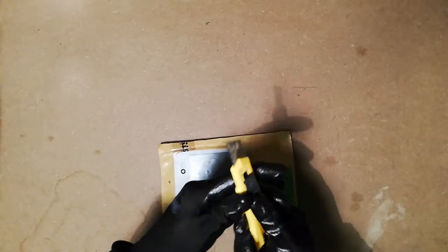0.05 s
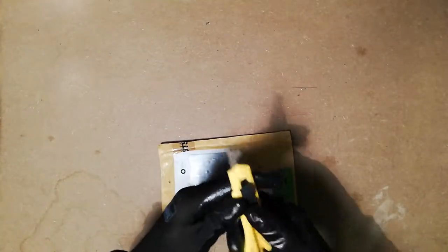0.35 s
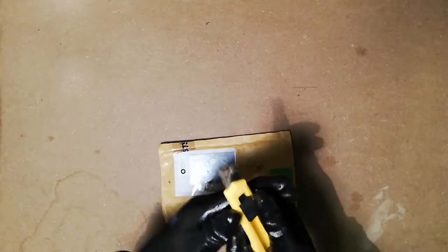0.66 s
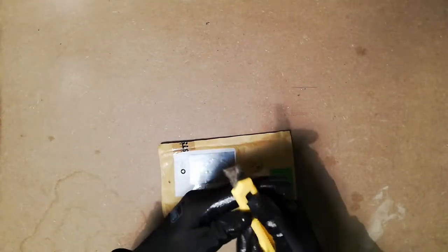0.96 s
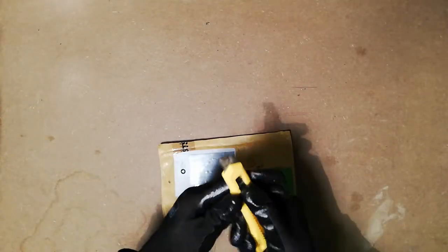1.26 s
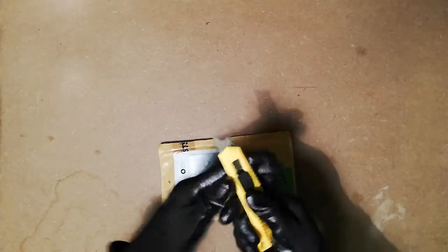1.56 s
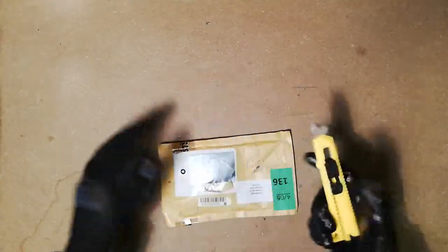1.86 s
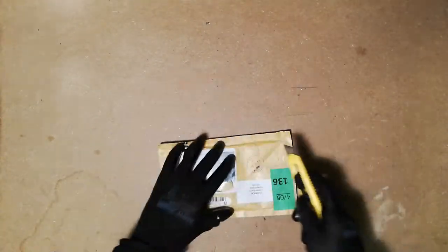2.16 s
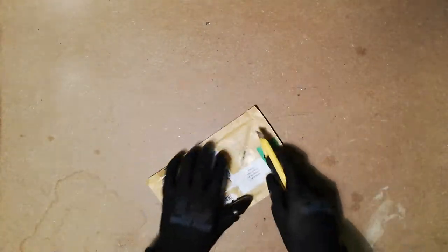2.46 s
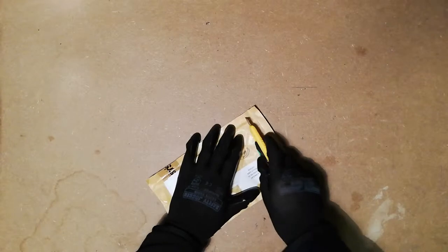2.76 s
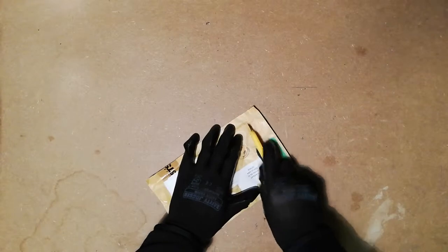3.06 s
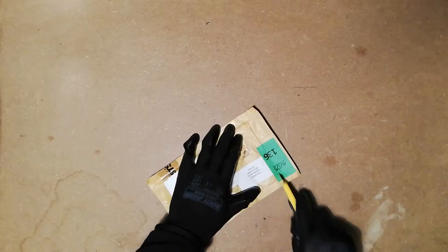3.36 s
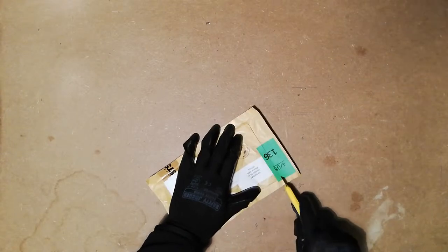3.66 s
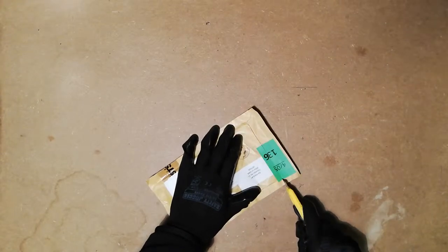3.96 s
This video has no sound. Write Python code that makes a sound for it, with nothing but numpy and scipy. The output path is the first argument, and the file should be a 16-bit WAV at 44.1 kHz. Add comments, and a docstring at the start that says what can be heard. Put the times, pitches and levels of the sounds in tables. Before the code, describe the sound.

A blade slices a padded envelope in one bright rip, after ticking and snapping into place in its plastic handle and some paper scuffing and crackling. A stereo microphone hangs above the table in a small quiet room.

```python
"""A plastic utility knife ticks and rattles in gloved hands; its steel blade snaps home twice and rings.
A padded paper envelope sticks, slips and buckles on a table while a low hum swells and stops.
The blade then rips along it in one stroke, snapping fibres; the slit rings lower as it grows.
Small quiet room, stereo microphone above the table."""
import sys
import numpy as np
from scipy import signal
from scipy.fft import rfft, irfft
from scipy.io import wavfile

SR = 44100
rng = np.random.default_rng(int(sys.argv[2]) if len(sys.argv) > 2 else 0)


def wav_record(signal):
    """Record a signal, one row per channel, as 16-bit PCM in the file named by sys.argv[1]."""
    frames = np.transpose(np.atleast_2d(signal))
    bounded = np.clip(frames, -1, 1)
    # unit amplitude maps onto the largest positive 16-bit level
    quanta = np.round(bounded * 32767).astype(np.int16)
    wavfile.write(sys.argv[1], SR, quanta)


N = 176400

# blade locks: t/s, level/dB, body/dB, crack/dB, treble/dB, handle resonance/Hz, ring/dB, ring decay/s
SNAPS = [(1.0854, -9, -30.5, -21, -12, 4780, 9, 0.001), (1.1475, -8, -33.5, -16.5, -14, 3090, 5, 0.0022)]
# paper response: f/Hz, level/dB
PAPER = [(250, -22), (800, -13.5), (1180, -1), (1480, -4), (2100, -3), (3000, -4.5), (7500, -9),
         (10500, -3), (16000, -28.5)]
FAST_EDGE_S, SLOW_EDGE_S = 0.0047, 0.042


def knife():
    """The slider ticks, the loose blade rattles and twice snaps home in the plastic handle."""
    # slider: t/s, level/dB, body/dB, crack/dB, treble/dB, handle resonance/Hz
    clicks = [(0.366, -35.5, -10.5, -26, -10.5, 5600), (0.54, -22.5, -14, -11.5, -21.5, 3680),
              (0.659, -28.5, -49, -8, -6, 3140), (0.885, -39.5, -13.5, -6.5, -7.5, 1570),
              (0.902, -28, -36, -8, -12, 3140), (1.303, -23.5, -24.5, -15.5, -14, 2660),
              (1.375, -16.5, -27.5, -12, -13, 3050), (1.472, -22, -16.5, -9.5, -14.5, 4840),
              (1.552, -29.5, -29, -5.5, -14.5, 2970), (1.584, -19, -28.5, -19, -24, 5670),
              (3.949, -48.5, -30, -5, -1.5, 6000)]
    faint_ticks = [(0.088, -30), (.262, -33.5), (.317, -37.5), (.464, -36.5), (.536, -27.5), (.765, -34.5),
                   (0.791, -39), (.978, -36.5), (1.076, -26), (1.136, -31), (1.315, -29), (1.4, -30.5),
                   (2.964, -32.5)]  # faint slider ticks and loose-blade rattles, with common band levels: t/s, level/dB
    handle = [(700, -22), (1250, -8), (1800, 0), (2250, -5), (3100, 3), (6000, -6), (9500, 2), (15000, -16)]  # handle response: f/Hz, level/dB
    faint_bands_db = (-27, -14, -16)
    ticks = knocks(clicks + [(*row, *faint_bands_db) for row in faint_ticks], handle, decay_s=0.0018)
    snaps = knocks([row[:-2] for row in SNAPS], handle, decay_s=0.002)
    return undb(-1) * ticks + undb(1.5) * snaps


def blade_ring():
    """The steel rings briefly at each snap, beamed at the left microphone."""
    modes = [(10050, -9), (10145, -8.5), (9030, -14.5), (11300, -17), (8500, -17)]  # steel modes: f/Hz, level/dB
    out, t = np.zeros(N), np.arange(SR // 20) / SR
    steel = sum(undb(db) * np.sin(2 * np.pi * hz * t) for hz, db in modes)
    attack = 1 - np.exp(-t / 0.0009)
    for at_s, *_, ring_db, decay_s in SNAPS:
        i = int(at_s * SR)
        out[i:i + len(t)] += steel * attack * np.exp(-t / decay_s) * undb(ring_db)
    return out * pan(left_over_right_db=10)


def cut():
    """The blade snaps fibres by the thousand, catching and running; the growing slit rings lower."""
    levels = [(2.99, -58.5, -56, -59), (3.033, -35, -39.5, -51), (3.07, -33.5, -34, -56),
              (3.11, -27.5, -28, -51.5), (3.17, -21.5, -28.5, -51.5), (3.205, -26.5, -27, -49),
              (3.28, -30, -29.5, -47.5), (3.36, -33.5, -31.5, -46.5), (3.425, -41, -38, -52.5),
              (3.465, -64, -66, -55.5)]  # stroke: t/s, treble/dB, middle/dB, bass/dB
    # tearing paper spectra: f/Hz, level/dB
    treble = [(5000, -40.5), (7500, -37), (8800, -8.5), (10000, 4.5), (11200, 1.5), (12300, -6.5),
              (13500, -15.5), (16000, -19)]
    middle = [(500, -15.5), (800, -15.5), (1300, 0.5), (1700, -9), (2400, 2), (3700, -1), (5200, 2),
              (9000, 0), (16000, -20)]
    bass = [(30, -7), (80, 1.5), (230, -10.5), (370, 1.5), (520, -16.5), (900, -10.5), (2000, -100)]
    balance = [(1500, -0.5), (7400, -1), (9600, 5), (11200, 2.5), (12800, -11.5), (16000, 6)]  # stereo balance: f/Hz, left over right/dB
    slit_hz, settle_s, slit_db, flicker_db = (9000, 2150), 0.12, 4, 2
    start_s, end_s = levels[0][0], levels[-1][0]
    catch = undb(-0.74 * walk(130.8)) * stroke(start_s, end_s, 0, 0, FAST_EDGE_S)
    fibres = grains(per_s=9000, spread_db=2)
    tear = sum(unit(colour(fibres, shape)) * undb(curve(levels, k + 1))
               for k, shape in enumerate((treble, middle, bass)))
    sides = undb(along(balance, N) * np.array([[.5], [-.5]]))
    tear = irfft(rfft(tear * catch) * sides, N)
    opening = 1 - np.exp((start_s - np.arange(N) / SR) / settle_s)
    slit_band = band_of(np.interp(opening, [0, 1], slit_hz))
    return sum(band * undb(flicker_db * walk(55) + slit_db * np.exp(-(k - slit_band) ** 2))
               for k, band in enumerate(bands_of(tear)))


def creases():
    """Padded paper buckles crisply, the blade pierces it twice, the paper taps the table dully and gives one
    tiny low crunch under the palm."""
    buckles = [(2.225, -16.5), (2.245, -21), (2.451, -26.5), (2.663, -27.5), (2.691, -15.5), (2.789, -15),
               (2.894, -22), (3.076, -15.5), (3.094, -17)]  # paper buckles, then at 3.076 and 3.094 s the blade piercing the envelope: t/s, level/dB
    taps = [(2.187, -27), (2.201, -22.5), (2.675, -31), (2.71, -27.5), (2.762, -29.5), (3.82, -35.5),
            (3.85, -41.5), (3.882, -32.5), (3.892, -38)]  # table taps: t/s, level/dB
    padding = [(150, 1.5), (750, 4), (1500, -22)]  # padding response: f/Hz, level/dB
    buckle_bands_db, tap_bands_db = (-16, -14, -13), (-9.5, -22.5, -24)
    rows = [(*row, *buckle_bands_db) for row in buckles] + [(*row, *tap_bands_db) for row in taps]
    crunch = unit(colour(noise(N), padding)) * stroke(2.5, 2.5, -47.5, -54.5, FAST_EDGE_S)
    return undb(-2) * knocks(rows, PAPER, decay_s=0.0018) + crunch


def envelope_drag():
    """Paper sticks and slips over the table, hissing as it goes."""
    drags = [(-.03, 0.333, -52.5, -69), (2.18, 2.268, -44.5, -44.5), (2.265, 2.475, -45.5, -51),
             (2.664, 2.726, -45, -40.5), (2.799, 2.861, -42, -55.5)]  # drag strokes: start/s, end/s, start level/dB, end level/dB
    slips_per_s, slip_decay_s = 51, 0.0027
    jitter, slip_db = rng.standard_normal((1000, 2)).T
    at = (np.cumsum(np.exp(0.44 * jitter)) / slips_per_s * SR).astype(int)
    slips = np.zeros(N)
    slips[at[at < N]] = undb(slip_db[at < N])
    gate = signal.lfilter([1], [1, -np.exp(-1 / (slip_decay_s * SR))], slips)
    judder = colour(gate * noise(N), PAPER)
    judder = unit(colour(judder, [(1500, 19), (5000, -17)]))
    hiss = colour(grains(per_s=6000, spread_db=1.5), PAPER)
    hiss = unit(colour(hiss, [(1300, -7), (4000, -5.5)]))
    motion = sum(stroke(*row, FAST_EDGE_S) for row in drags)
    return motion * (undb(-2) * judder + undb(2.5) * hiss)


def gloves():
    """Soft, fine friction on knife and paper."""
    rubs = [(-.03, 0.114, -41, -56), (0.141, 0.516, -54, -62.5), (0.537, .7, -46, -76),
            (1.3, 1.71, -59.5, -56), (1.79, 1.928, -54.5, -53), (2.778, 3.005, -49.5, -48.5),
            (3.731, 3.795, -45.5, -40), (3.814, 4.02, -68.5, -66)]  # rub strokes: start/s, end/s, start level/dB, end level/dB
    glove = [(600, -7.5), (1300, -4), (2200, -0.5), (3200, -0.5), (7500, -2), (10000, 5.5), (16000, -14.5)]  # friction spectrum: f/Hz, level/dB
    friction = unit(colour(grains(per_s=12000, spread_db=3.5), glove)) * undb(2 * walk(70))
    return friction * sum(stroke(*row, SLOW_EDGE_S) for row in rubs)


def hum():
    """A low, drifting tone swells and stops."""
    track = [(1.92, 71.4, -73), (2.066, 74.8, -54.5), (2.39, 73.6, -42), (2.56, 76.4, -48),
             (2.745, 75.4, -44.5), (2.79, 75, -71)]  # hum: t/s, f/Hz, level/dB
    tone = np.sqrt(2) * np.sin(2 * np.pi * np.cumsum(curve(track, 1)) / SR)
    return tone * undb(curve(track, 2)) * stroke(track[0][0], track[-1][0], 0, 0, SLOW_EDGE_S)


def background():
    """Steady room air and a wavering hollow noise near 350 Hz, fainter near 1300 Hz."""
    # noise spectra: f/Hz, level/dB
    air_shape = [(12, -40), (20, 3.5), (81, -2.5), (270, -21.5), (574, -27.5), (976, -22), (16000, -24)]
    hollow_shape = [(190, -34.5), (300, -0.5), (380, 2.5), (540, -19), (900, -14.5), (1280, -5.5),
                    (2600, -34)]
    hollow_level = [(0, -52.5), (.35, -58.5), (.75, -70), (1, -59.5), (1.2, -74), (4, -78)]  # hollow noise: t/s, level/dB
    air, hollow = (unit(colour(noise(N), shape)) for shape in (air_shape, hollow_shape))
    return undb(-61) * air + undb(curve(hollow_level, 1) + 3 * walk(20)) * hollow


def room(x):
    """Quick table reflections, then a diffuse tail as each band's stored energy dies away."""
    early_decay_s, early_db, t60_s, tail_db = 0.0087, -5.5, 0.42, -11
    t = np.arange(SR // 8) / SR
    reflections = unit(noise(len(t)) * np.exp(-t / early_decay_s) * (t > .002)) / np.sqrt(len(t))
    early = signal.fftconvolve(x, reflections, axes=1)[:, :N]
    retained = np.exp(-2 * np.log(1000) / (t60_s * SR))
    tail = 0
    for band, diffuse in zip(bands_of(x), bands_of(noise(N))):
        energy = signal.lfilter([1 - retained], [1, -retained], np.mean(band ** 2, axis=0))
        tail += np.sqrt(energy) * unit(diffuse)
    return undb(early_db) * early + undb(tail_db) * tail


def knocks(rows, response, decay_s, size=4096):
    """Dying bursts through a body whose resonances shift with the grip; plastic adds a ringing peak."""
    bands = [(1000, 2200), (2200, 6000), (8000, 13000)]  # body, crack and treble bands: low/Hz, high/Hz
    attack_s, plastic_db, plastic_width_hz = 0.00041, 11.5, 180
    out, t, hz = np.zeros((2, N + size)), np.arange(size) / SR, np.fft.rfftfreq(size, 1 / SR)
    for at_s, db, body_db, crack_db, treble_db, *resonances_hz in rows:
        grip = np.exp(0.06 * rng.standard_normal())
        burst = noise(size) * np.exp(-t / decay_s) * (1 - np.exp(-t / attack_s))
        burst = colour(burst, [(f * grip, level) for f, level in response])
        for f in resonances_hz:
            peak = signal.iirpeak(f, f / plastic_width_hz, fs=SR)
            burst = burst + undb(plastic_db) * signal.lfilter(*peak, burst)
        # tilt towards the row's band levels, energy taken over 4 ms
        power = np.mean(abs(rfft(burst)) ** 2, axis=0) * 2 / size / (SR * .004)
        tilt = [(np.sqrt(lo * hi), band_db - 10 * np.log10(power[(hz > lo) & (hz < hi)].sum()))
                for (lo, hi), band_db in zip(bands, (body_db, crack_db, treble_db))]
        i = int(at_s * SR)
        out[:, i:i + size] += colour(burst, tilt) * undb(db)
    return out[:, :N]


def grains(per_s, spread_db):
    """Tiny fractures at random times, a few larger than the rest."""
    events = rng.random(N) < per_s / SR
    sizes = undb(spread_db * np.minimum(rng.exponential(size=N), 5))
    return unit(pair(events * sizes * rng.standard_normal((2, N))))


def stroke(start_s, end_s, start_db, end_db, edge_s):
    """Gain ramp with soft edges."""
    t = np.arange(N) / SR
    gate = np.clip(np.minimum(t - start_s, end_s - t) / edge_s + .5, 0, 1)
    return gate * undb(np.interp(t, [start_s, end_s], [start_db, end_db]))


def pair(x):
    """Two unrelated signals to left and right, alike in the bass."""
    likeness = [(60, 1), (250, 0.82), (600, 0.14), (1200, 0.89), (2500, 0.52), (10000, 0.05)]  # left-right likeness: f/Hz, correlation
    n = x.shape[-1]
    correlation = np.clip(along(likeness, n), -.999, .999)
    mid, side = irfft(rfft(x) * np.sqrt([1 + correlation, 1 - correlation]), n)
    return np.array([mid + side, mid - side]) / 2


def noise(size):
    """Stereo white noise."""
    return pair(rng.standard_normal((2, size)))


def colour(x, table):
    """Minimum-phase filter from a table of f/Hz, level/dB."""
    n = x.shape[-1]
    cepstrum = irfft(np.log(undb(along(table, n))), n)
    cepstrum[1:n // 2] *= 2
    cepstrum[n // 2 + 1:] = 0
    return irfft(rfft(x) * np.exp(rfft(cepstrum)), n)


def along(table, size):
    """Table of f/Hz, value, read at each FFT bin."""
    hz, value = np.array(table).T
    return np.interp(np.log(np.fft.rfftfreq(size, 1 / SR) + 1), np.log(hz), value)


def curve(table, column):
    """Column of a time table, read at each sample."""
    rows = np.array(table)
    return np.interp(np.arange(N) / SR, rows[:, 0], rows[:, column])


def walk(hz):
    """Smooth random drift, rms 1."""
    return unit(np.interp(np.arange(N) * hz / SR, np.arange(4000), rng.standard_normal(4000)))


def band_of(hz):
    """Fractional band index; bands widen towards the treble."""
    return np.sqrt(np.asarray(hz) / 80)


def bands_of(x):
    """Split into 16 overlapping bands."""
    spectrum, place = rfft(x), band_of(np.fft.rfftfreq(N, 1 / SR))
    return [irfft(spectrum * np.clip(1 - abs(place - k), 0, 1), N) for k in range(16)]


def pan(left_over_right_db):
    """Constant-power stereo gains."""
    return unit(undb(left_over_right_db * np.array([[.5], [-.5]])))


def undb(db):
    """Decibels to gain."""
    return 10 ** (np.asarray(db) / 20)


def unit(x):
    """Scale to rms 1."""
    return x / np.sqrt(np.mean(x ** 2) + 1e-20)


def scene():
    """All sources in the room; sound reaches the right microphone slightly later."""
    right_lag_s = 3e-5
    hits, ring = knife() + creases(), blade_ring()
    friction = envelope_drag() + gloves() + cut()
    reverb = room(hits + undb(-5) * ring + undb(-4) * friction)
    left, right = hits + ring + friction + reverb + hum() + background()
    delay = np.exp(-2j * np.pi * np.fft.rfftfreq(N, 1 / SR) * right_lag_s)
    return np.array([left, irfft(rfft(right) * delay, N)])


def record(dry):
    """Clip near full scale, then low-pass."""
    top_hz = 15750
    lowpass = signal.ellip(12, .1, 90, top_hz, fs=SR, output="sos")
    return signal.sosfilt(lowpass, np.clip(dry, -.97, .97))


dry = scene()
out = record(dry)
wav_record(out)
```